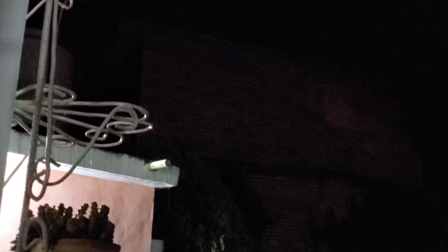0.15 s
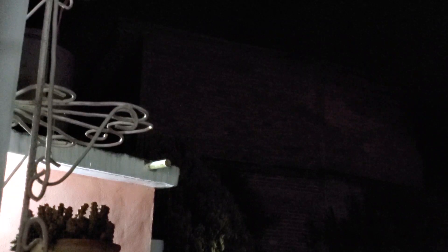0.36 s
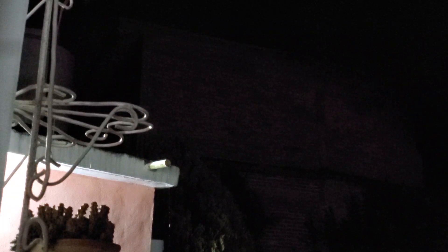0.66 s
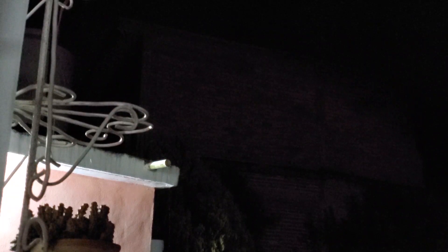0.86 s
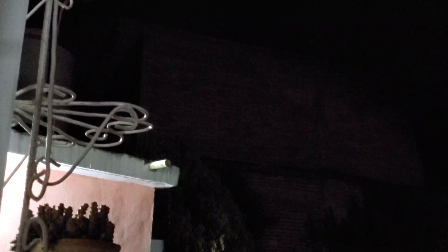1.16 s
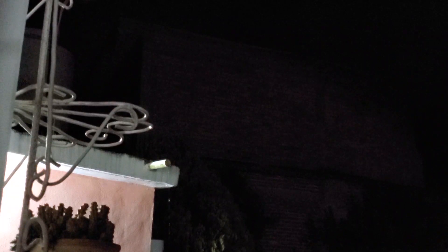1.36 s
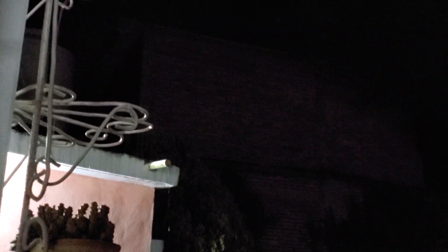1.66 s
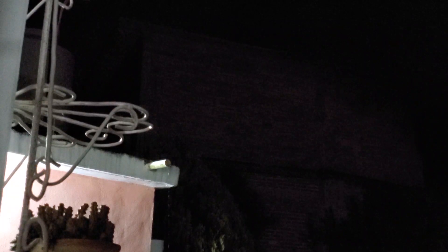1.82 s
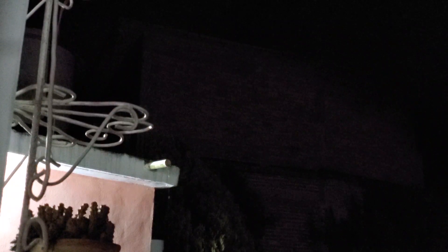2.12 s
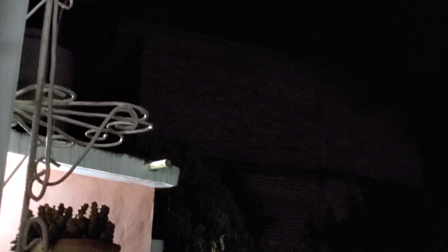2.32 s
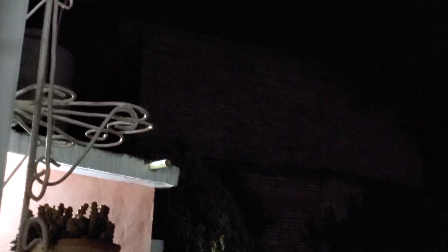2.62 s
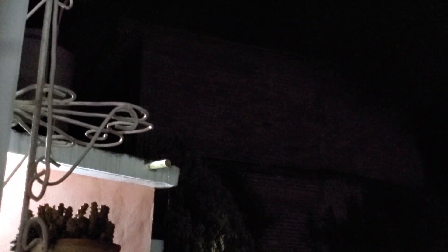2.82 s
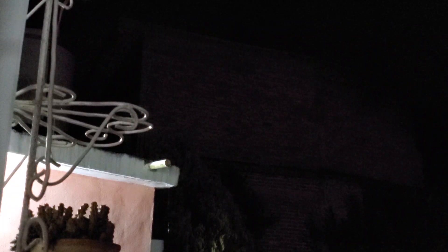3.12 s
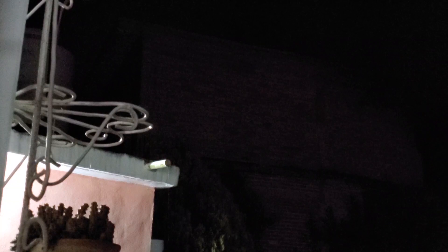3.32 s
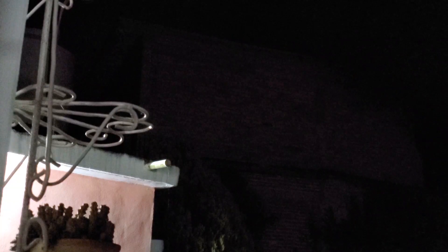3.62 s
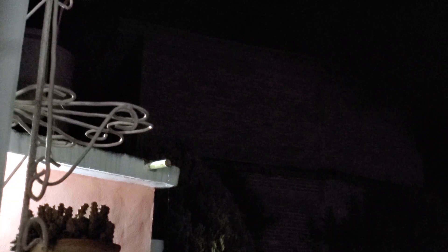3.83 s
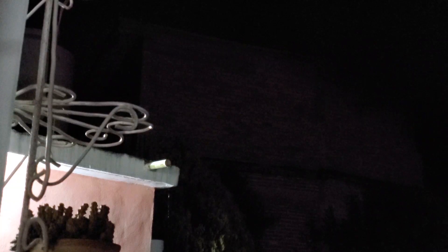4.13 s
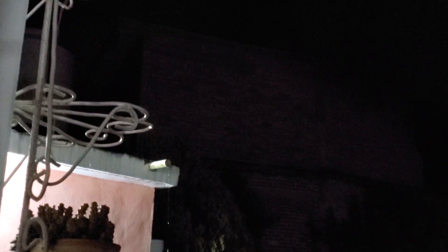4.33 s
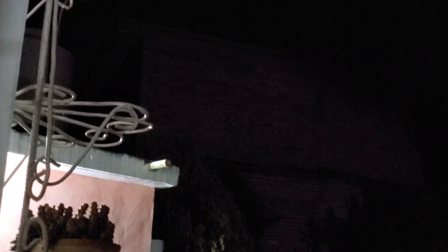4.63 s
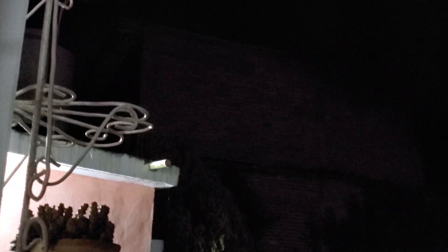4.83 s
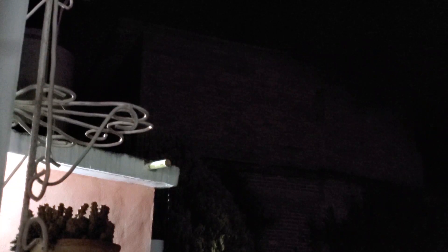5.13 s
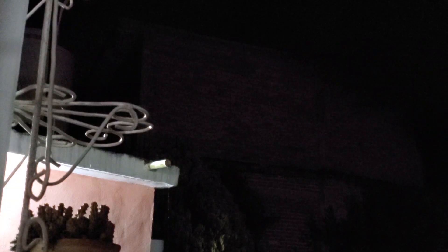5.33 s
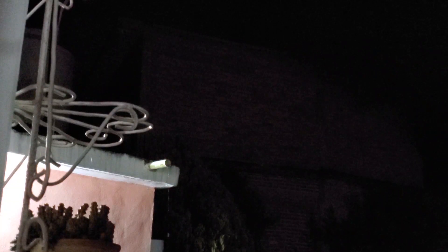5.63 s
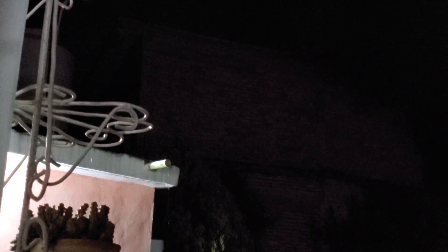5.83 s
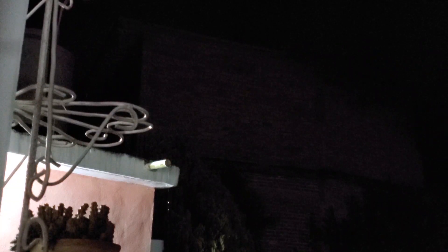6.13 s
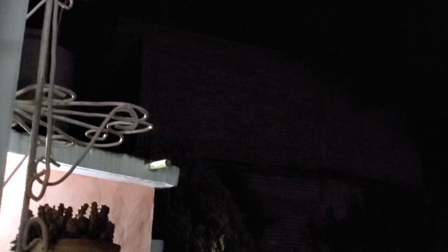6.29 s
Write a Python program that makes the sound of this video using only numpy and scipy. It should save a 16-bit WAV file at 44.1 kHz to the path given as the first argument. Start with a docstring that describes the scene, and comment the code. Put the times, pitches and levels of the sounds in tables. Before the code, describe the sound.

Raindrops plop and spit onto wet ground close by in a walled yard while a low engine-like drone swells beneath.

```python
"""A walled yard at night in light rain: eaves drops splash on wet ground or tick on a ledge close by.
Each is a resonant plop and/or a noisy spit, with an echo off the nearest wall and a ring round the yard.
A fine drizzle is shaped noise: a steady hiss plus single ticks.
A low drone of sine partials, like a far engine drawing nearer, builds with a dull noise rumble.
Late on, a hollow hum swells once and two faint far tones sound."""
import sys
import numpy as np
from scipy import signal
from scipy.fft import rfft, irfft, next_fast_len
from scipy.io import wavfile
from scipy.ndimage import map_coordinates

SR = 44100
rng = np.random.default_rng(int(sys.argv[2]) if len(sys.argv) > 2 else 0)


def output_pcm(signal):
    """Save a mono or channel-first signal as 16-bit PCM at the path in sys.argv[1].

    Samples are clipped to [-1, 1] before scaling.
    """
    pcm = np.clip(np.atleast_2d(signal).T, -1, 1) * 32767
    wavfile.write(sys.argv[1], SR, np.round(pcm).astype(np.int16))


N = 284886
TIME = np.arange(N) / SR
TOP_HZ = 15850  # band limit
SIDES = np.array([[.5], [-.5]])  # left, right share of a left-minus-right difference
SPLASH_PAN_DB = -6  # left minus right, of a splash's tick

# treble kept by the direct path: f/Hz, gain/dB
NEARNESS = [(1000, -10), (4000, -2.5), (7000, -3.5), (10000, -8), (14000, 1.5)]
# big drops on wet ground, lower plop in a deeper puddle:
# t/s, plop pitch/Hz, plop energy/dB, spray energy/dB, tick energy/dB
SPLASHES = [(.058, 4120, -15.5, -11, -22), (.208, 4250, -17.5, -9, -19.5), (.284, 4500, -18.5, -8, -16),
            (0.386, 3800, -21, -8, -15), (.811, 2580, -19, -7.5, -19), (.877, 2720, -15.5, -15, -27),
            (1.042, 2700, -13.5, -9, -15), (1.113, 2720, -11, -9.5, -12), (1.215, 2900, -13.5, -8.5, -12),
            (1.587, 2400, -16.5, -9.5, -8), (1.654, 2290, -15.5, -10, -22), (1.694, 4140, -10.5, -7.5, -8),
            (1.826, 2870, -11.5, -4, -6.5), (1.864, 3570, -14.5, -20, -21.5),
            (2.069, 2400, -13, -7.5, -2.5), (2.167, 3730, -14, -7, -10), (2.695, 4460, -9.5, -7.5, -14.5),
            (2.960, 5000, -19, -9, -18), (3.191, 2180, -12.5, -3, -4.5), (3.350, 4320, -12, -8.5, -12),
            (3.597, 4340, -15, -7.5, -10), (3.689, 2700, -8.5, -5.5, -5), (3.805, 1630, -8, -6.5, -5.5),
            (3.984, 2060, -6.5, -6, -10), (4.053, 2960, -11.5, -1, -7), (4.245, 2097, -7, -10, -15),
            (4.348, 2770, -10.5, -5, -2), (4.466, 5000, -16.5, -4.5, -13), (4.615, 4200, -13, -11, -12),
            (4.769, 3400, -18, -8, -5.5), (4.851, 2740, -16.5, -18, -6), (4.972, 4540, -18.5, -13, -18),
            (5.013, 6600, -18, -5, -14), (5.259, 1850, -8, -12.5, -13), (5.453, 3650, -16.5, -8.5, -15),
            (5.501, 6000, -12.5, -3, -16), (5.584, 3640, -11.5, -7, -11), (5.612, 3060, -8.5, -3.5, -23),
            (5.739, 4000, -10.5, -6, -7.5), (5.829, 3700, -16.5, -6.5, -8.5),
            (6.022, 5340, -17.5, -16, -18), (6.089, 2210, -18.5, -20, -26), (6.143, 1801, -15, -13.5, -15),
            (6.282, 2560, -17.5, -10, -14.5), (6.321, 5000, -12.5, -9, -9.5),
            (6.370, 2720, -16.5, -14, -20)]
# the drone draws nearer: t/s, gain/dB
APPROACH = [(0, -11), (.25, -0.5), (3.4, .5), (5.4, 6.5), (5.95, 10), (6.46, 12)]


def amp(db):
    """Decibels to gain."""
    return 10 ** (np.asarray(db) / 20)


def unit(x):
    """Scaled to rms 1."""
    return x / np.sqrt(np.mean(np.abs(x) ** 2) + 1e-20)


def along(points, hz):
    """(Hz, value) points read on a log frequency axis."""
    f, v = np.transpose(points)
    return np.interp(np.log(hz + 1), np.log(f), v)


def curve(rows):
    """(s, value) points read at every sample."""
    s, value = np.transpose(rows)
    return np.interp(TIME, s, value)


def bump(t, centre_s, half_s):
    """Gaussian of height 1."""
    return np.exp(-((t - centre_s) / half_s) ** 2 / 2)


def wobble(rate):
    """A smooth random curve, rate knots a second."""
    knots = rng.standard_normal(int(N * rate / SR) + 4)
    return map_coordinates(knots, [TIME * rate])


def filtered(x, response):
    """x times a response of frequency."""
    m = next_fast_len(N + SR // 2)
    hz = np.fft.rfftfreq(m, 1 / SR)
    return irfft(rfft(x, m) * response(hz), m)[..., :N]


def causal(gain):
    """The minimum-phase response with this gain, by folding the cepstrum."""
    cepstrum = irfft(np.log(gain))
    half = len(cepstrum) // 2
    return np.exp(rfft(np.r_[cepstrum[0], 2 * cepstrum[1:half], np.zeros(half)]))


def pair(spectrum, noise):
    """Two unrelated noises as a coloured diffuse field of rms 1, near mono in the bass."""
    # f/Hz, left-right likeness/1
    likeness = [(60, 0.95), (125, 0.85), (250, 0.98), (500, 0.49), (1000, 0), (4000, 0)]

    def mid_side(hz):
        turn = np.arccos(np.clip(along(likeness, hz), -1, 1)) / 2
        return amp(along(spectrum, hz)) * np.array([np.cos(turn), np.sin(turn)])

    mid, side = filtered(noise, mid_side)
    return unit(np.array([mid + side, mid - side]))


def wall(hz, share):
    """Response of the direct path plus the nearest wall's echo, share being the echo's gain."""
    delay_s = rng.normal(.00435, .00005)
    return 1 + share * np.exp(-2j * np.pi * hz * delay_s)


def lull(s):
    """The rain eases for a moment: its change of level in dB at time s."""
    return -5 * bump(s, centre_s=1.416, half_s=.1)


def drizzle(level_db=-43, hiss_db=-2, patter_db=-6, per_second=45, spread_db=1.5):
    """Countless far droplets merge into a hiss; nearer ones tick one by one, each repeated by the wall."""
    # f/Hz, density/dB per Hz
    colour = [(300, -33), (700, -1), (1200, -19.5), (2500, -3.5), (4000, 0.5), (7000, -0.5), (9000, -4),
              (12000, 5), (15000, 5.5)]
    hiss = pair(colour, rng.standard_normal((2, N))) * amp(hiss_db + 2.9 * wobble(43))

    sizes = amp(spread_db * np.clip(rng.standard_normal(N), -2, 1.5))
    hits = sizes * (rng.random(N) < per_second / SR)
    burst = np.hanning(28)  # samples
    envelope = signal.fftconvolve(hits, burst)[:N]
    patter = pair(colour, envelope * rng.standard_normal((2, N)))
    patter = unit(filtered(patter, lambda hz: amp(along(NEARNESS, hz)) * wall(hz, share=0.38)))
    return amp(level_db + lull(TIME)) * (hiss + amp(patter_db) * patter)


def drone(flutter_db=1.76, drift_rad=0.078):
    """Partials of the firing rate grow as the source nears, fading or swelling on its way between the houses."""
    # t/s, firing rate/Hz
    firing = [(0, 45.38), (1, 46.02), (2.4, 46.9), (3.1, 47.85), (4.4, 48.42), (5.2, 48.8), (6.1, 48.77),
              (6.46, 49.43)]
    # multiple/1, level at 0 dB approach/dB, growth/dB per dB of approach, left minus right/dB, left lead/rad
    partials = [(1, -49.5, 0.9, -0.5, .08), (2, -60, 1.26, -1, 0.1), (3, -54.5, 1.04, -2, 0.24),
                (4, -71.5, 1, 0, 0.9), (5, -67, 0.93, -5, 0.83)]
    # passing fades and swells: t/s, multiple/1, half length/s, change/dB
    fades = [(.75, 1, .3, 0), (1.8, 1, 0.38, -20), (2.74, 1, .25, -6), (4.9, 1, 0.3, 2),
             (3.901, 2, 0.13, 5.5), (5.15, 2, 0.16, -5), (1.313, 3, 0.033, -28), (2.8, 3, 0.33, 3),
             (3.59, 3, 0.12, -8), (3.8, 3, .05, 5), (4.02, 3, 0.098, -6.5)]
    near_db = curve(APPROACH)
    phase = 2 * np.pi * np.cumsum(curve(firing)) / SR
    out = np.zeros((2, N))
    for k, level_db, grows, pan_db, lead_rad in partials:
        fade_db = sum(db * bump(TIME, s, half_s) for s, multiple, half_s, db in fades if multiple == k)
        mono_db = level_db + grows * near_db + fade_db + flutter_db * wobble(7.7)
        angle = k * phase + drift_rad * wobble(25) + lead_rad * SIDES
        out += np.sqrt(2) * amp(mono_db + pan_db * SIDES) * np.sin(angle)
    return out


def rumble(base_db=-52.5, grows=0.52, pan_db=-2.2):
    """Dull noise that grows with the drone, by grows dB per dB of approach above 0 dB."""
    # f/Hz, density/dB per Hz
    colour = [(20, -14), (35, -17), (60, -2), (110, -1), (180, -1), (250, -5.5), (320, -6), (420, -5.5),
              (600, -12.5), (900, -16), (2000, -22.5), (6000, -80)]
    level_db = base_db + grows * np.maximum(curve(APPROACH), 0) + 1.1 * wobble(7)
    return pair(colour, rng.standard_normal((2, N))) * amp(level_db + pan_db * SIDES)


def impact(t, hz, burst_s, pan_db, fizz=1.0):
    """Spectra of the direct sound: a snap and a short noise burst, reaching the left microphone first."""
    envelope = t / burst_s * np.exp(-t / burst_s)
    burst = 1 + fizz * unit(rfft(rng.standard_normal(len(t)) * envelope))
    lead_s = rng.normal(.00011, .00002)
    right_late = np.exp(-2j * np.pi * hz * lead_s * np.array([[0], [1]]))
    return burst * right_late * amp(pan_db * SIDES)


def yard(t, t60, build_s, speckle_db, lump_db):
    """Spectra of the yard's answer at both microphones: noise swells, fades in lumps, with reflections standing out."""
    speckle = np.repeat(rng.standard_normal(len(t) // 16), 16)
    lumps = map_coordinates(rng.standard_normal(64), [t * 90], order=1)
    decay_db = -60 * t / t60
    shape = (1 - np.exp(-t / build_s)) * amp(speckle_db * speckle + lump_db * lumps + decay_db)
    return unit(rfft(rng.standard_normal((2, len(t))) * shape))


def plop(t, hz, pitch_hz, level_db, knock_db=-6.5, sharpness=1.2):
    """Spectra of a hollow resonant plop: a direct knock, knock_db over its echoes, then the yard's answer."""
    cavity = unit(1 / (1 + 1j * sharpness * (hz / pitch_hz - pitch_hz / hz)) ** 2)
    knock = unit(cavity * impact(t, hz, burst_s=0.00035, pan_db=-2)) * wall(hz, share=0.21)
    ring = yard(t, t60=0.43, build_s=0.0041, speckle_db=3.0, lump_db=1)
    echoes = cavity * ring * unit(wall(hz, share=0.2))
    return amp(level_db) * (amp(knock_db) * knock + echoes)


def spit(t, hz, tick_db, spray_db, pan_db, tint_db=1.5):
    """Spectra of a bursting water film, randomly tinted: a sharp tick, then bright spray ringing round the yard."""
    # f/Hz, gain/dB
    film = [(400, -17), (1000, -20.5), (3000, -17), (6500, -5.5), (9000, -8.5), (12000, -1.5),
            (15000, -0.5)]
    tint = tint_db * np.interp(hz, np.linspace(0, TOP_HZ, 6), rng.standard_normal(6))
    colour = unit(causal(amp(along(film, hz) + tint)) * (hz < TOP_HZ))

    near = causal(amp(along(NEARNESS, hz)))
    snap = impact(t, hz, burst_s=0.00014, pan_db=pan_db)
    tick = unit(colour * near * snap) * wall(hz, share=0.43)

    ring = yard(t, t60=0.63, build_s=0.0013, speckle_db=3.5, lump_db=2.5)
    spray = colour * ring * unit(wall(hz, share=0.12))
    return amp(tick_db) * tick + amp(spray_db) * spray


def small_splashes(count=20, pitch_hz=4200, octaves=0.33, plop_db=-22, spray_db=-16, tick_db=-16, spread_db=3.0):
    """Lesser drops fall at random in between, eased by twice the lull in dB: rows like SPLASHES."""
    chance = rng.random(count)
    depth, weight = rng.standard_normal((2, count))
    times = (np.arange(count) + chance) * N / SR / count
    size_db = spread_db * weight + 2 * lull(times)
    pitches_hz = pitch_hz * 2 ** (octaves * depth)
    return list(zip(times, pitches_hz, plop_db + size_db, spray_db + size_db, tick_db + size_db))


def rebounds(flight_s=.03, tick_db=-10, spray_db=-14):
    """Each big splash throws up a droplet that lands later, in proportion to its spray: (s, tick dB, spray dB)."""
    flights = flight_s * (.5 + rng.random(len(SPLASHES)))
    return [(s + flight, db + tick_db, db + spray_db)
            for (s, _, _, db, _), flight in zip(SPLASHES, flights)]


def drops(size=12288, ledge_spray_db=-6):
    """A drop on wet ground plops and spits; one on the ledge and a rebounding droplet only spit."""
    # drops on a hard ledge next to the microphones: t/s, tick energy/dB, left minus right/dB
    ledge_ticks = [(.320, -8.5, -7), (.5926, -1, -1.5), (0.6244, 1, 0), (.696, -16, -5), (.986, -12.5, -1),
                   (1.528, -13.5, -9), (2.125, -16, -6), (2.591, -14, -3), (3.057, -11.5, 2),
                   (3.129, -8, 3.5), (4.6387, -9.5, -3), (5.117, -4.5, -1), (5.396, -16.5, 0),
                   (6.444, -8.5, -8)]
    t = np.arange(size) / SR
    hz = np.fft.rfftfreq(size, 1 / SR) + 1  # +1 avoids dividing by zero
    sounds = []
    for s, pitch_hz, plop_db, spray_db, tick_db in list(SPLASHES) + small_splashes():
        splash = plop(t, hz, pitch_hz, plop_db) + spit(t, hz, tick_db, spray_db, SPLASH_PAN_DB)
        sounds.append((s, splash))
    for s, tick_db, pan_db in ledge_ticks:
        sounds.append((s, spit(t, hz, tick_db, tick_db + ledge_spray_db, pan_db)))
    for s, tick_db, spray_db in rebounds():
        sounds.append((s, spit(t, hz, tick_db, spray_db, SPLASH_PAN_DB)))

    out = np.zeros((2, N + size))
    for s, spectrum in sounds:
        start = round(s * SR)
        out[:, start:start + size] += irfft(spectrum)
    return out[:, :N]


def boom(level_db=-49, peak_s=5.6, rise_db_per_s=7.5, fall_db_per_s=15, centre_hz=230,
         waver_rad=0.91, flutter_db=2.0, lead_rad=0.29):
    """A hollow hum within the rumble, a sine of wavering phase, swells once and fades."""
    below_db = np.maximum(rise_db_per_s * (peak_s - TIME), fall_db_per_s * (TIME - peak_s))
    phase = 2 * np.pi * centre_hz * TIME + waver_rad * wobble(18) + lead_rad * SIDES
    return np.sqrt(2) * amp(level_db - below_db + flutter_db * wobble(14)) * np.sin(phase)


def hoots(waver_rad=1.0):
    """Two faint far tones: short sine bumps blurred by random phase."""
    # t/s, f/Hz, half length/s, level/dB
    tones = [(5.988, 611, .025, -49.5), (6.121, 879, .012, -50)]
    out = np.zeros(N)
    for s, hz, half_s, db in tones:
        phase = 2 * np.pi * hz * TIME + waver_rad * wobble(hz / 4)
        out += amp(db) * bump(TIME, s, half_s) * np.sin(phase)
    return out


def scene():
    """Near drops and drizzle over the far drone."""
    return drizzle() + drone() + rumble() + drops() + boom() + hoots()


def record(dry):
    """The two microphones differ a little in balance over frequency; nothing is kept above the band limit."""
    # f/Hz, left minus right/dB
    balance = [(800, -0.5), (2000, 0.0), (4000, -3.0), (8000, 0.0), (13000, 2.5)]
    return filtered(dry, lambda hz: amp(along(balance, hz) * SIDES) * (hz < TOP_HZ))


dry = scene()
out = record(dry)
output_pcm(out)
```